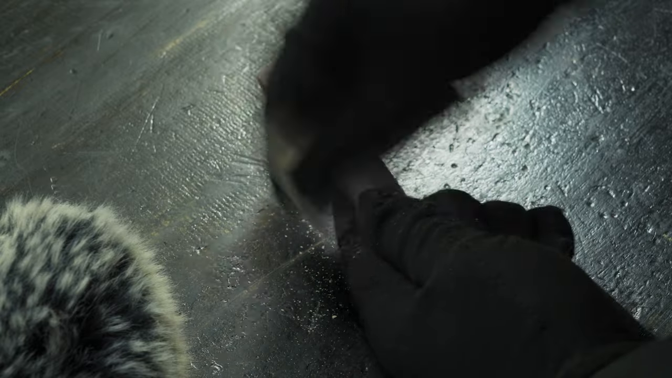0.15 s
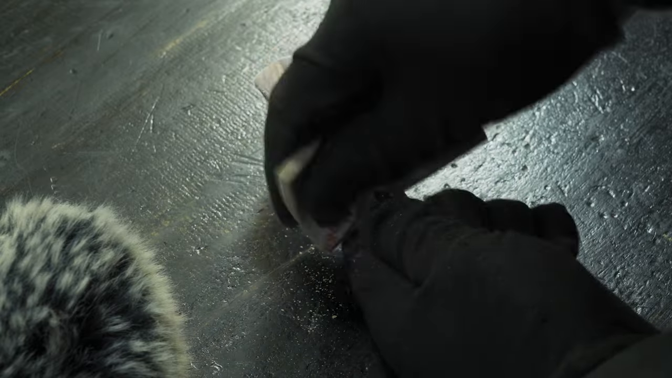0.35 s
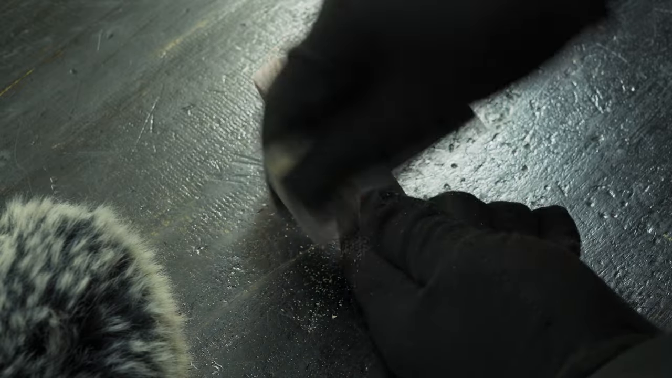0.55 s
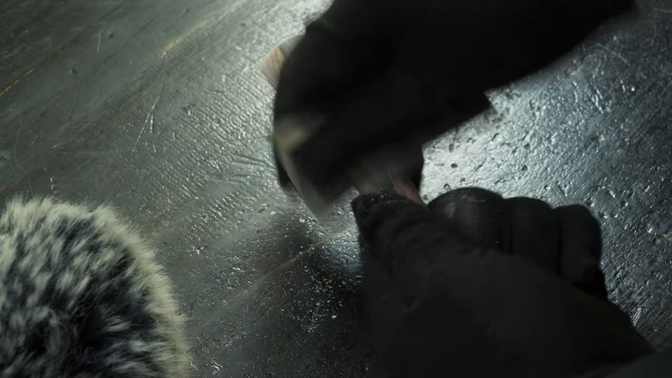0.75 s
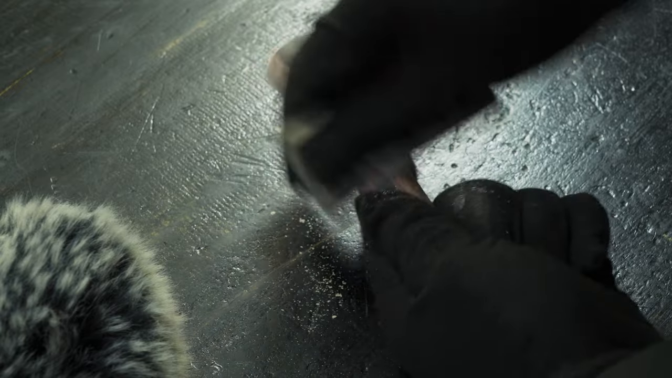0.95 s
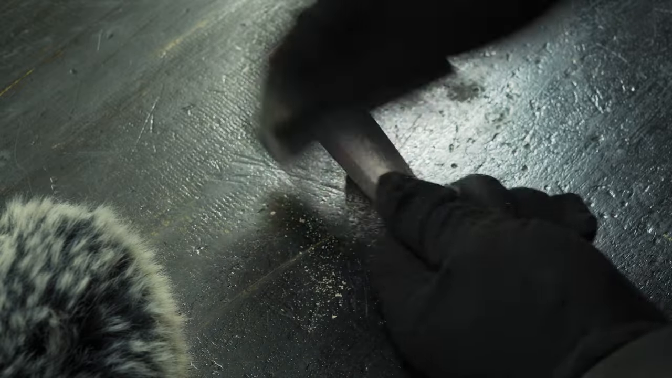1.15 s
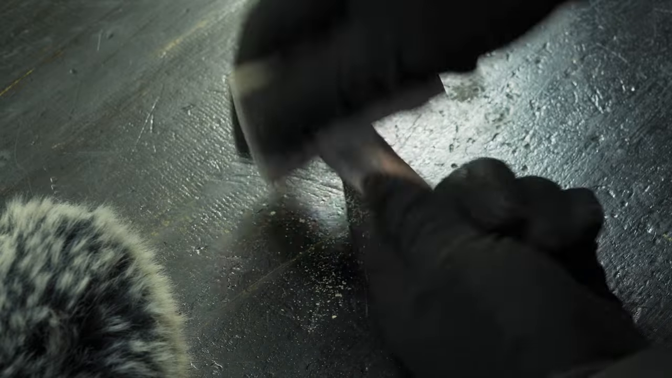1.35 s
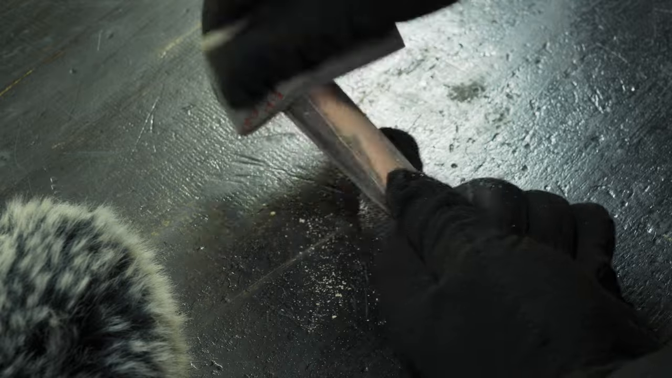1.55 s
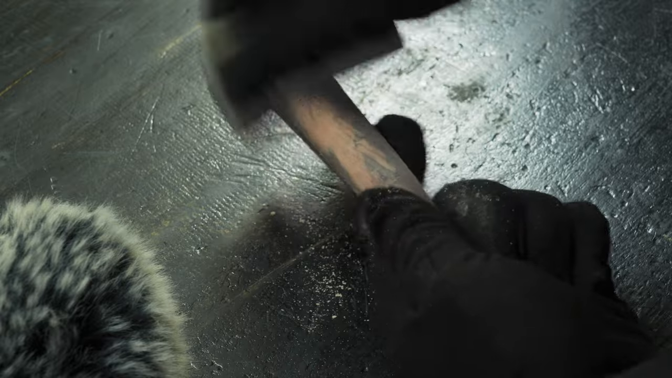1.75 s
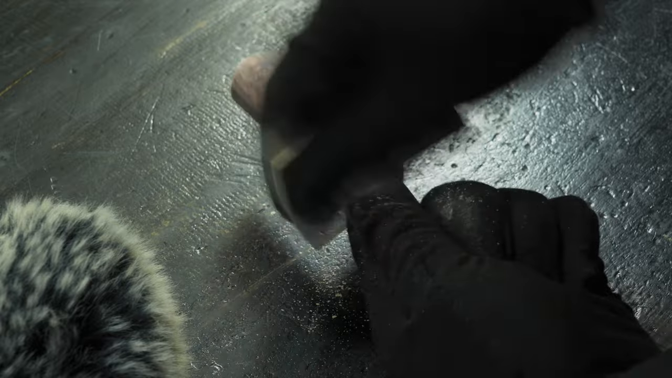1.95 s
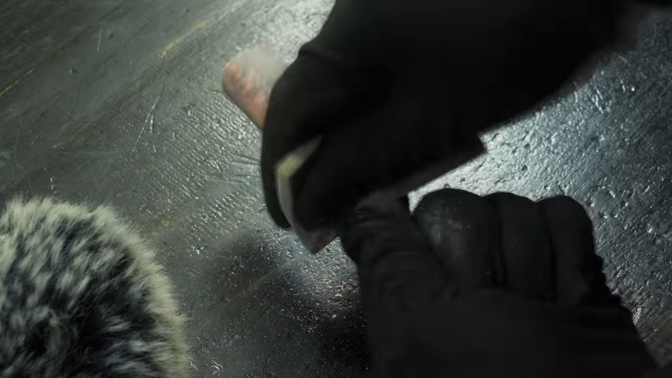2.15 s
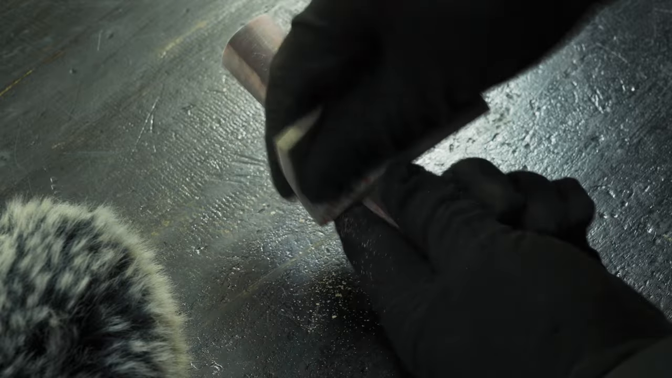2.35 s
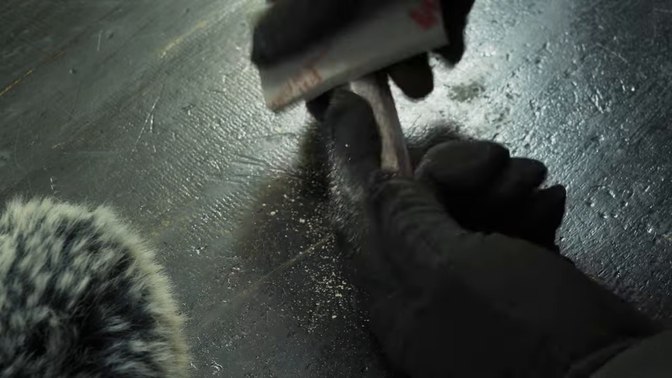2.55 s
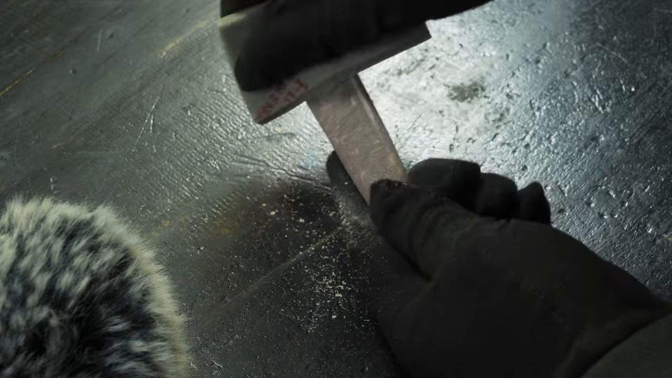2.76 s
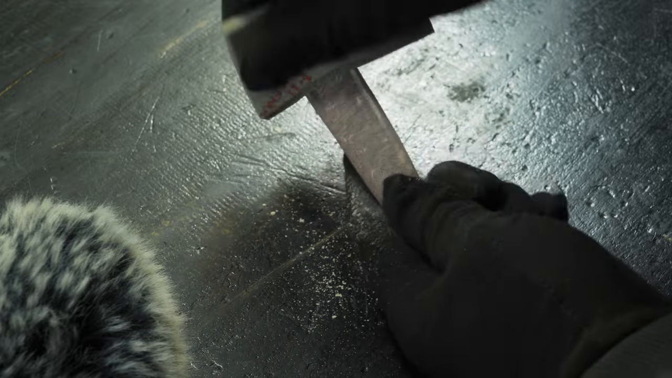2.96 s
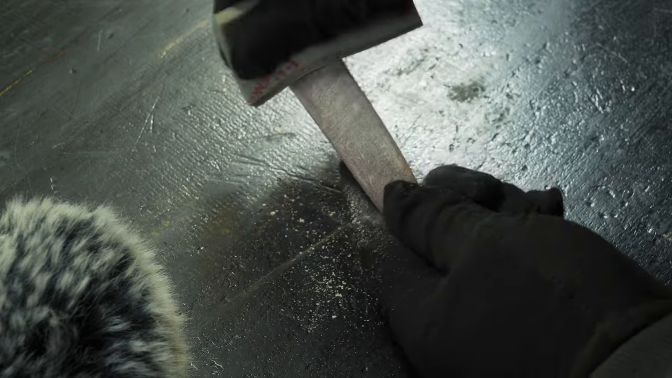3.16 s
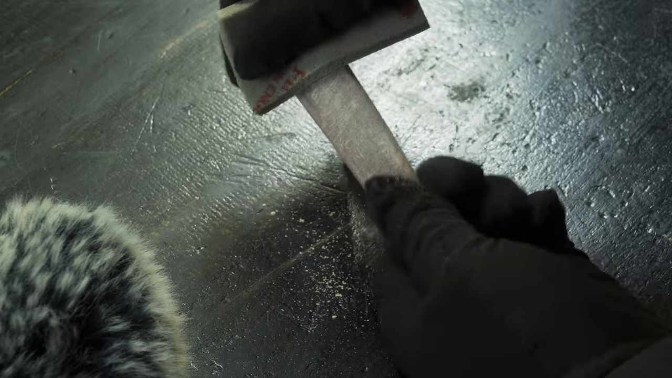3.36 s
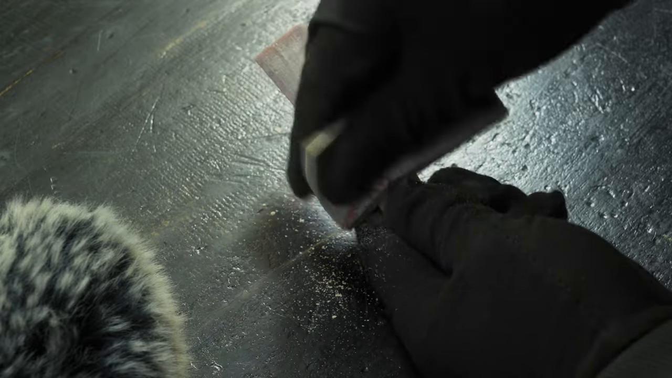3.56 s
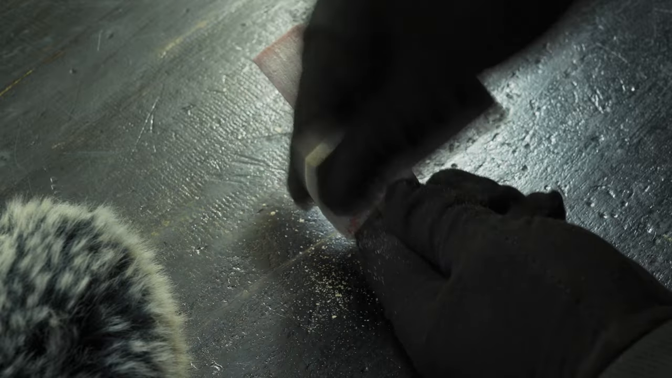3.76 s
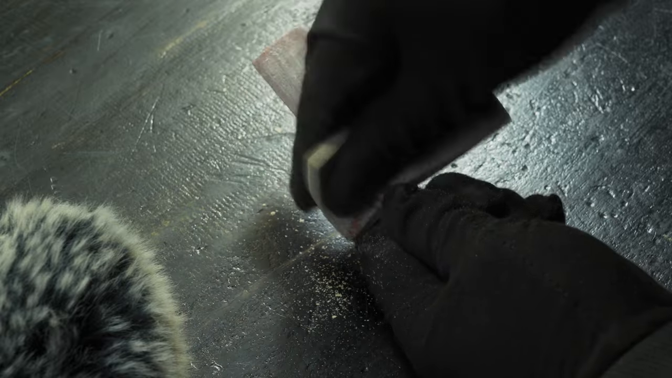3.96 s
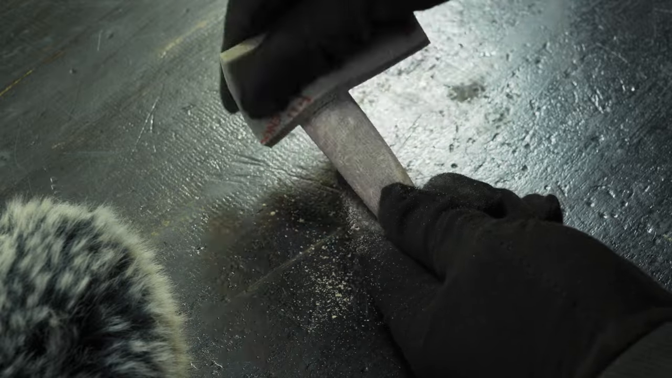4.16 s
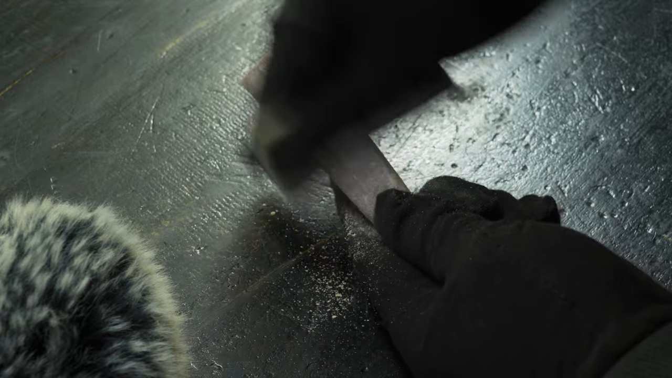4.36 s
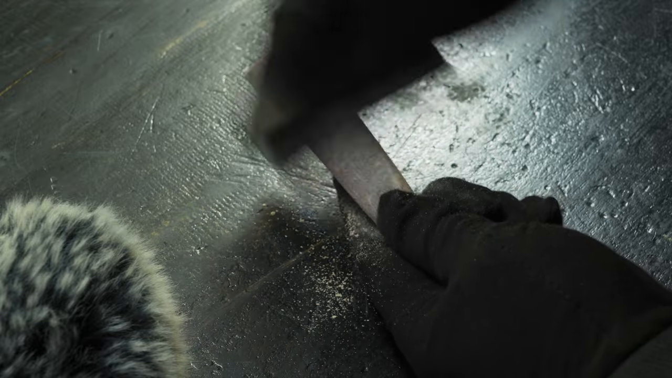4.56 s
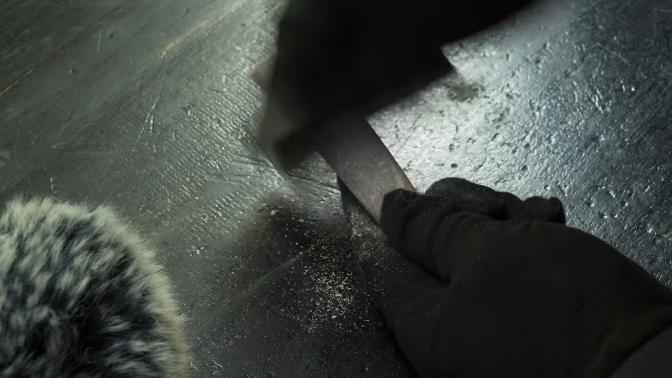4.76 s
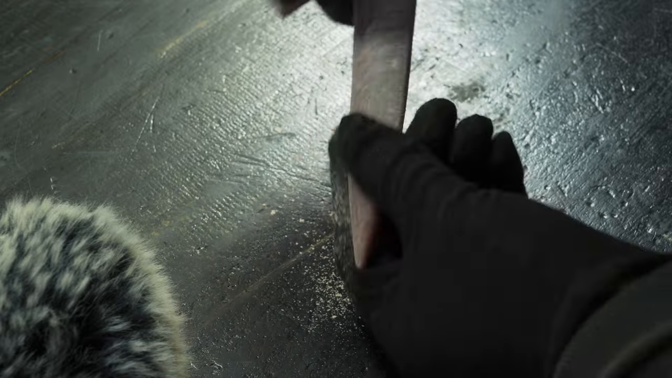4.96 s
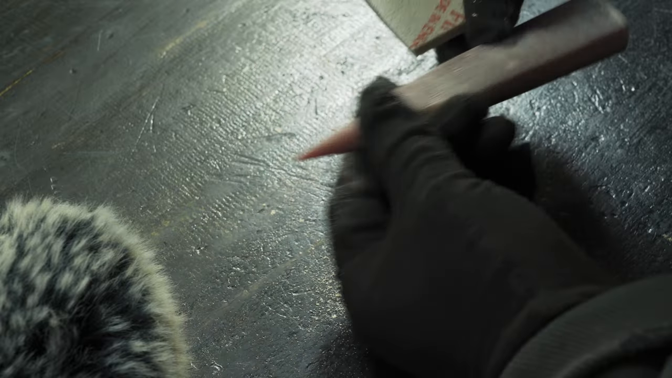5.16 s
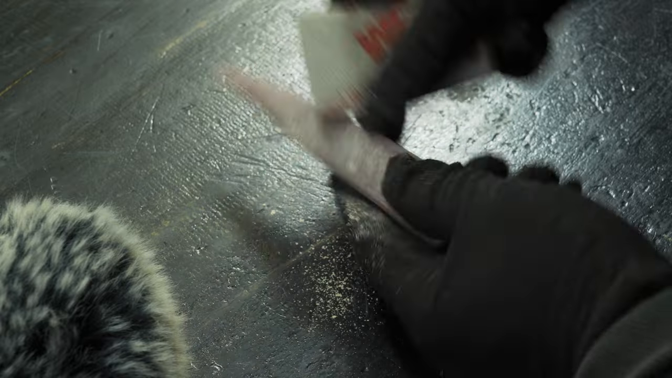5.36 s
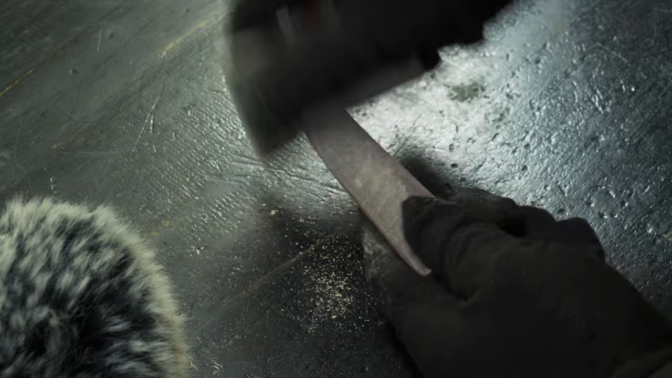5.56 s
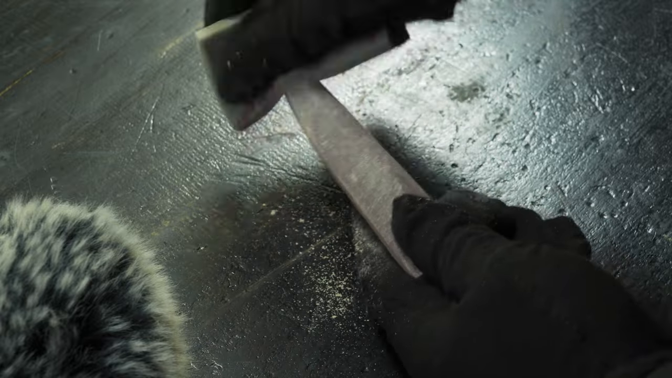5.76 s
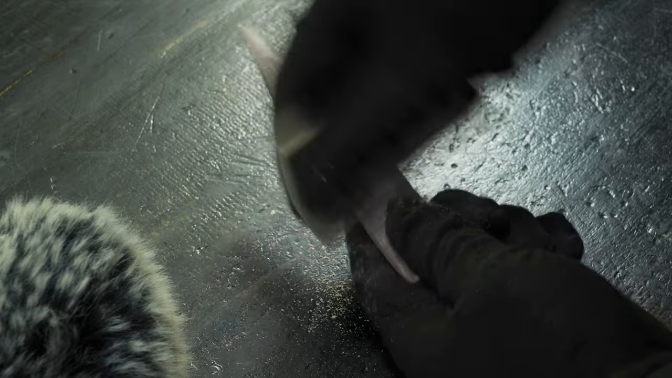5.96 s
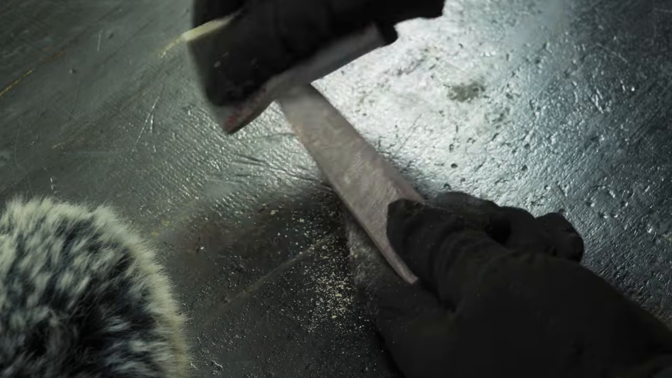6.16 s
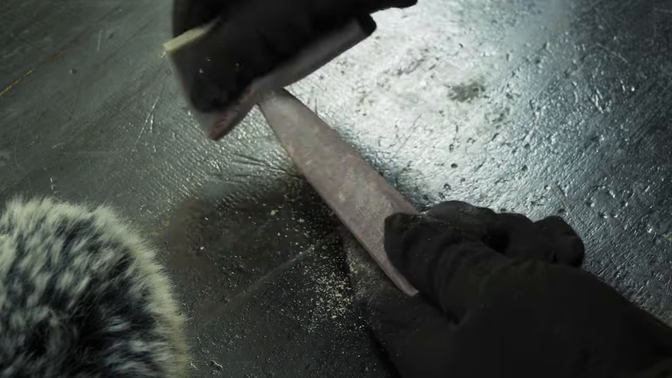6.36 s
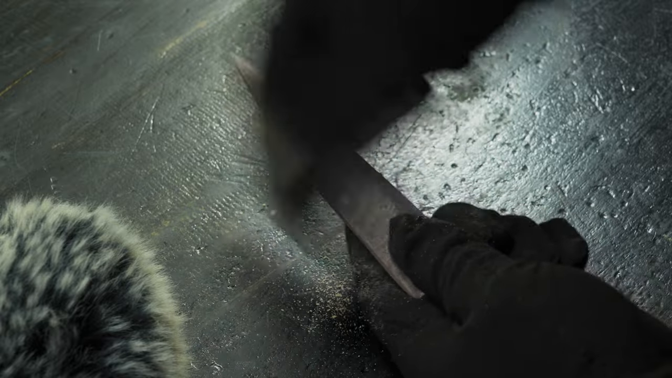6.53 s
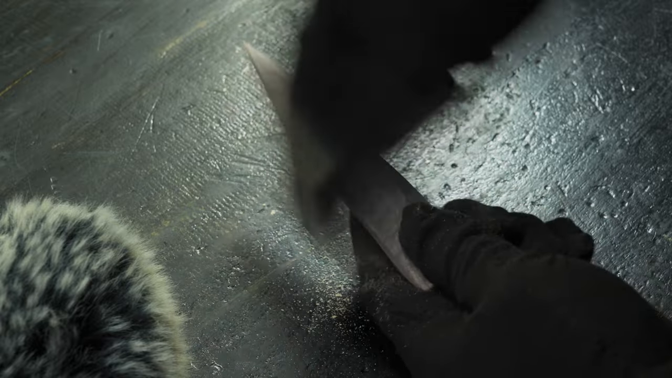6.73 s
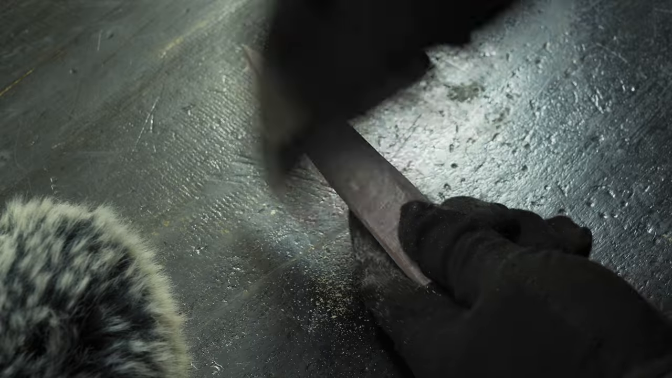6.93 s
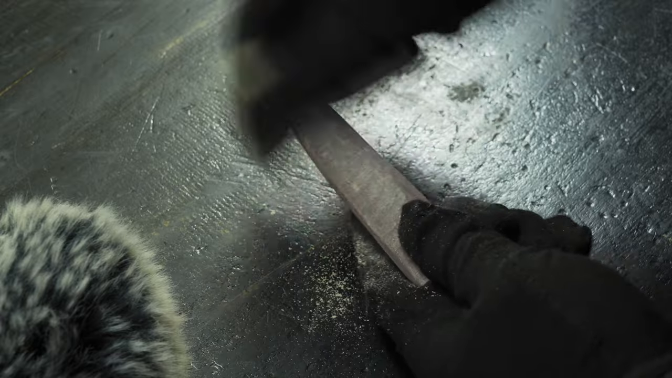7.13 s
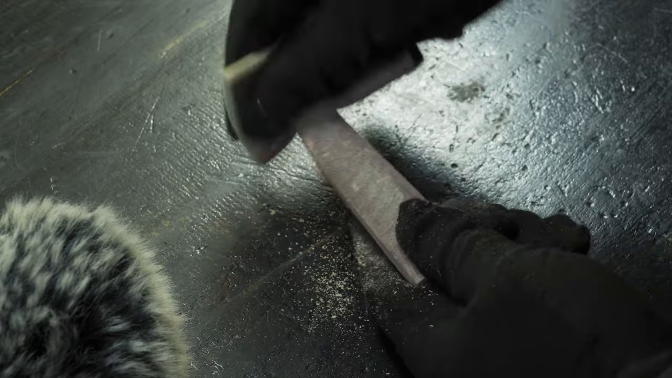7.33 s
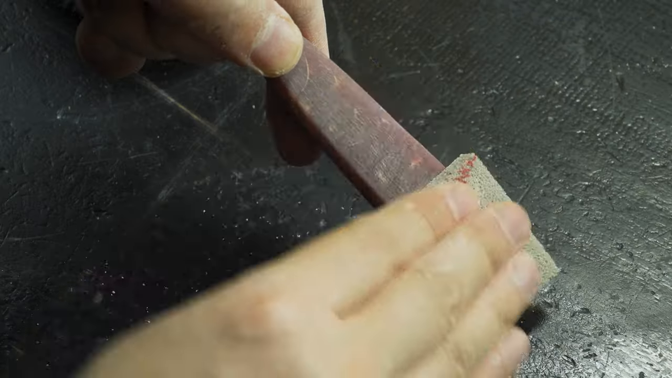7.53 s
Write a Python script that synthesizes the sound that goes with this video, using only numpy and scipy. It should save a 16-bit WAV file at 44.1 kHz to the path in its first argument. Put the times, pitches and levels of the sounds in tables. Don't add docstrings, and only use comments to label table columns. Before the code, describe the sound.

Close, dry, rapid sanding strokes, about twenty rasps a second, paused by rustling grip shifts, small clacks and faint thumps on a table.

```python
import sys
import numpy as np
from scipy import signal
from scipy.fft import rfft, irfft
from scipy.io import wavfile
from scipy.ndimage import uniform_filter1d

SR = 44100
rng = np.random.default_rng(int(sys.argv[2]) if len(sys.argv) > 2 else 0)


def undo_db(level):
    steps = np.asarray(level, float) / 20
    return 10 ** steps


def master_out(mix):
    frames = np.transpose(np.atleast_2d(mix))
    ceiling = np.clip(frames, -1, 1)
    pcm = np.round(ceiling * 32767).astype(np.int16)
    wavfile.write(sys.argv[1], SR, pcm)


N = 334719
TIME = np.arange(N) / SR
HZ = np.fft.rfftfreq(N, 1 / SR) + 1

# push_s, pull_s, push_db, pull_db
ROUND_SIDE = [(.031, .081, -37.5, -41.5), (.132, .177, -38.5, -39.5), (.226, .273, -39.5, -39.5),
              (.323, .365, -38.5, -39.5), (.417, .463, -39.5, -40), (.513, .557, -40.5, -40),
              (.609, .652, -40, -40.5), (.711, .756, -37, -42), (.811, .851, -42.5, -46),
              (.901, .948, -44.5, -45.5), (1.000, 1.052, -47.5, -44.5), (1.100, 1.145, -41, -40),
              (1.196, 1.240, -38, -40.5), (1.561, 1.606, -41, -42), (1.657, 1.702, -44, -42),
              (1.750, 1.796, -45, -46), (1.844, 1.887, -47, -49), (2.027, 2.071, -46.5, -46.5),
              (2.123, 2.166, -43.5, -46.5), (2.220, 2.263, -45.5, -45), (2.315, 2.363, -47, -43.5),
              (2.417, 2.464, -45.5, -43.5)]
# push_s, pull_s, push_db, pull_db, tip_tap_db as the push sets in
FIRST_FLAT = [(3.067, 3.114, -37, -39, -79), (3.175, 3.215, -38, -39, -60.5), (3.265, 3.313, -40, -41, -73),
              (3.507, 3.557, -43.5, -41.5, -70), (3.622, 3.661, -41.5, -41.5, -80),
              (3.722, 3.769, -42, -41, -53.5), (3.822, 3.869, -42, -40.5, -75),
              (3.92, 3.969, -43, -41, -62), (4.020, 4.065, -41.5, -41.5, -81),
              (4.117, 4.162, -44, -43.5, -67), (4.3, 4.347, -42.5, -42, -54.5),
              (4.397, 4.446, -41.5, -41, -57), (4.496, 4.544, -41, -41, -52.5),
              (4.593, 4.640, -42.5, -42, -61.5), (4.690, 4.738, -42.5, -41, -58.5)]
SECOND_FLAT = [(5.645, 5.693, -37.5, -39.5, -86), (5.756, 5.798, -37.5, -40.5, -70),
               (5.858, 5.904, -38.5, -38.5, -67), (6.024, 6.076, -42.5, -40, -61.5),
               (6.13, 6.175, -38.5, -41.5, -52.5), (6.335, 6.385, -42.5, -40.5, -66),
               (6.508, 6.557, -42.5, -39.5, -57.5), (6.608, 6.651, -39.5, -39, -58),
               (6.704, 6.752, -40, -38, -52.5), (6.804, 6.851, -39.5, -39, -46),
               (6.906, 6.949, -38.5, -39.5, -50.5), (7.008, 7.056, -39, -40, -60.5),
               (7.11, 7.157, -39.5, -39.5, -53), (7.214, 7.266, -39, -40, -44.5),
               (7.319, 7.37, -38, -39.5, -50), (7.425, 7.471, -38, -39.5, -54)]
# start_s, length_s, start_db, end_db, body_db re grit
LONE_STROKES = [
    (0.0, 0.014, -47, -57, -10.5),
    (1.341, .017, -48, -47, -12),
    (1.43, 0.045, -53, -47.5, -20),
    (1.502, .04, -44, -41.5, -23),
    (2.51, .028, -41, -40.5, -9.5),
    (2.76, 0.018, -46, -49, -18),
    (4.791, 0.031, -41.5, -37, -14),
    (4.838, 0.048, -39.5, -34, -17.5),
    (7.527, .03, -39.5, -39.5, -19.5),
]
# time_s, push_swell_db, pull_swell_db, thick_end_body_db, thin_end_body_db
GRIP = [(0, 1, -6, -4, -8), (.35, 4.5, -9.5, -10.5, -16.5), (.65, 8, -11, -12, -18),
        (1.0, 3, -6, -15, -19.5), (1.2, 4, -11.5, -12.5, -21.5), (1.6, -3, -9, -13, -22),
        (1.9, 6, -9, -14.5, -26.5), (2.45, 5, -10.5, -17.5, -28), (3.05, -6.5, -2, -5.5, -9),
        (3.35, 4, -6, -8.5, -10.5), (3.5, 3.5, -4, -7, -10), (4.0, 4.5, -8, -6, -13.5),
        (4.75, 4.5, -6, -8, -13), (5.6, -5, 0.5, -13, -19.5), (6.15, -3.5, -5, -12, -14.5),
        (6.35, 3, -2.5, -10, -18), (6.9, 2.5, -4, -14.5, -18), (7.5, 2, -6.5, -14.5, -21)]
# time_s, after_push_s, after_pull_s, softness (of stop and start, ratio)
TURN_RESTS = [(0, 0.014, .015, 0.76), (1.9, 0.013, 0.01, 0.94), (2.45, 0.013, 0.0061, 0.87),
              (3.05, 0.013, 0.014, 0.75), (4.8, .013, .012, 0.78), (5.6, .012, 0.018, 0.97),
              (7.5, 0.017, 0.015, 0.64)]
LONGEST_PULL_S, LAST_PULL_S = 0.0427, 0.039
BOUT_GAP_S = 0.066
PULL_THICK_DB, PULL_THIN_DB = -2.5, -3.5

# start_s, length_s, start_db, end_db, paper_db re grit
SCUFFS = [(1.278, 0.047, -63, -60, -5), (1.328, .012, -69, -66, -8), (1.359, .011, -58, -60, -2),
          (1.396, .011, -65, -65, -6), (1.421, .01, -66, -62, -2), (2.545, .057, -57, -53, -1),
          (2.708, .04, -80, -83, -24), (2.813, .015, -70, -71, 4), (2.618, 0.032, -57.5, -65, 1),
          (2.652, 0.056, -77, -70.5, -8), (2.777, 0.08, -70, -78, 0), (2.865, 0.0069, -71, -63, 3),
          (3.004, 0.018, -56, -77, -13), (3.028, 0.048, -69, -65.5, -17), (4.884, 0.057, -50, -56, -10),
          (4.943, .048, -66, -74, -10), (4.993, .19, -78, -84, -34), (5.215, .014, -73, -74, -30),
          (5.1835, 0.002, -50, -50, -12), (5.188, 0.14, -77, -82, -34), (5.328, .016, -86, -84, 8),
          (5.345, 0.022, -81, -83, 8), (5.37, .04, -80, -78, -24), (5.41, 0.074, -74, -64, -1),
          (5.484, 0.03, -59, -59, -4), (5.518, 0.062, -60, -60, -8), (5.58, .018, -65, -66, -6),
          (5.6, 0.028, -59, -60, -4)]
# start_s, length_s, start_db, end_db
GLOVE_RUBS = [
    (.132, 0.0029, -58, -50),
    (2.317, 0.0064, -41, -54),
    (2.891, 0.014, -61, -59.5),
    (3.471, 0.005, -67, -72),
    (5.292, 0.02, -74, -74),
    (5.298, .008, -67, -67),
    (5.555, .025, -68, -68),
]
SCUFF_SOFTNESS = 2.2
SCUFF_BODY_DB, SCUFF_BODY_SLOPE = -15, -0.084
GLOVE_BODY_DB, GLOVE_PAPER_DB = 0.5, -32
CREEP_SHARE, CREEP_SLOWER = 0.18, 3.4

# time_s, top_band_db re middle band, hollow_db
EDGE = [(0, -2.5, 0.5), (.3, 2, -2), (.8, 0.5, -5.5), (1.3, 3, -4.5), (2.45, 1.5, -5), (3.05, -2, 0),
        (3.5, 5, 1), (4.9, 3, -2), (5.6, 0, 1), (6.5, 0.5, 0.5), (7.59, 3.5, -0.5)]
# pitch_hz, level_db per Hz
GRIT = [(530, -18.5), (900, -30), (1330, -29), (1410, -28), (1980, -18.5), (3490, -8), (3800, -6.5),
        (4780, 3), (6700, -4.5), (7470, 1.5), (8960, -2.5), (11500, 2.5), (13200, -3), (15100, -0.5),
        (15850, -0.5), (16250, -24.5)]
BODY_TOP_HZ, EDGE_FROM_HZ = 3440, 11240
HOLLOW_HZ, HOLLOW_WIDTH_HZ = 6200, 1200
PAD_HZ, PAD_TILTED_HZ, PAD_WIDTH_HZ = 4900, 5900, 650

# pitch_hz, level_db, t60_s
BOARD = [(424, 4.5, 0.066), (592, -10.5, 0.074), (245, -10, 0.03)]
ROOM_T60_S, ROOM_DB, ROOM_CUT_HZ = 0.125, -16, 3900
SCENE_CHANGES_S = 7.563
# pitch_hz, level_db
HUM = [(60, -22), (110, -28), (160, -11), (250, -7), (420, -4.5), (640, -1.5), (800, -4.5), (1020, -2),
       (1400, -5), (2300, -11), (3900, -22), (5200, -21.5), (12000, -29), (12500, -52)]
# time_s, level_db
HUM_DB = [(0, -74), (3, -74), (5.2, -74.5), (7.59, -76.5)]
# pitch_hz, level_db
FAN_LINES = [(150, -99), (900, -85), (1015, -83.5)]

# start_s, peak_db, pitch_hz
JOLTS = [(0.248, -62.5, 264), (0.532, -54.5, 245), (0.708, -60.5, 248), (2.069, -69, 137),
         (2.165, -62, 303), (2.261, -70, 117), (2.338, -61.5, 223), (2.436, -58, 225), (2.645, -68, 262),
         (3.621, -64.5, 230), (3.666, -66, 210), (3.70, -67, 200), (3.76, -68, 205), (5.771, -63, 172),
         (6.602, -60.5, 256), (6.839, -60.5, 173), (7.344, -62.5, 204), (7.45, -61, 299), (7.567, -70, 150)]
# start_s, peak_db, pitch_hz
JOLTS_EARLY = [(0.316, -66, 223), (0.44, -66, 304)]
JOLTS_ROUND_PAUSE = [(0.984, -71, 304), (1.192, -68, 221), (1.585, -69, 288), (1.681, -68, 127),
                     (1.778, -67, 245), (1.869, -62, 213)]
JOLTS_LATE = [(5.875, -63, 253), (6.018, -67, 339), (6.125, -62, 339), (6.273, -83, 151)]
# time_s, peak_db
TURN_BUMPS = [(0, -64.5), (2.5, -60), (3.1, -80), (5.6, -63), (7.5, -59)]
THUMP_HZ, THUMP_T60_S = 152, 0.034

# start_s, peak_db
EARLY_TAPS = [(0.034, -68), (0.066, -62), (0.162, -69), (0.414, -66), (0.454, -68), (0.541, -58), (0.607, -70)]
# start_s, peak_db
TAPS = [(.636, -63), (.714, -49), (.949, -60), (.989, -55.5), (1.731, -51.5), (2.131, -55), (2.218, -62),
        (2.247, -58), (2.344, -55), (3.139, -60), (3.615, -58), (3.846, -57), (3.943, -62), (4.031, -56),
        (4.406, -52), (4.53, -55), (4.725, -48.5), (4.794, -49), (4.821, -43.5), (5.45, -66),
        (5.667, -63.5), (6.367, -66), (6.408, -70), (6.522, -59), (6.543, -58), (7.082, -70), (7.251, -55),
        (7.291, -69), (5.877, -57), (6.634, -54), (6.834, -51.5), (6.938, -56), (7.138, -55.5),
        (7.354, -58), (7.454, -48.5), (7.529, -52)]
# start_s, peak_db, pitch_hz, t60_s
KNOCKS = [(0.7159, -22, 4960, 0.0051), (.7150, -26.5, 2330, 0.0039), (0.717, -36, 1425, 0.011),
          (4.8821, -25, 3100, 0.002), (4.8824, -28, 338, 0.013), (4.8832, -37, 1050, 0.0079),
          (5.185, -40, 300, 0.01), (5.198, -20, 875, 0.0029), (5.1980, -20, 2300, 0.0008),
          (5.1978, -37, 3900, .004), (5.1835, -50, 1600, .008), (5.338, -43, 428, 0.075),
          (5.3367, -41.5, 592, 0.053), (5.338, -49, 1310, 0.069), (5.338, -54, 1000, .03),
          (5.3560, -50, 1335, 0.045), (5.3560, -53, 425, 0.07), (5.356, -55, 600, .06),
          (5.355, -61, 1110, .035), (2.319, -40, 2300, .006), (7.5570, -46, 248, 0.013),
          (7.556, -49, 595, 0.014)]
# start_s, peak_db, centre_hz
TICKS = [(1.3703, -52, 8000), (2.662, -68, 8000), (2.671, -68, 6000), (2.686, -68, 4600),
         (2.785, -62, 9000), (2.805, -65, 9000), (2.813, -63, 7000), (2.8671, -60, 10000),
         (2.872, -60, 7000), (3.0033, -60, 5200), (3.0297, -62, 5700), (3.046, -62, 7000),
         (3.051, -62, 6000), (4.938, -57, 4500), (4.946, -61, 4000), (4.981, -68, 7000), (4.99, -66, 6500),
         (5.008, -68, 6500), (5.0994, -69, 6000), (5.107, -71, 7500), (5.132, -72, 6500),
         (5.1518, -72, 8000), (5.1832, -52, 7900), (5.4471, -63, 11000), (5.485, -54, 11000),
         (5.505, -54, 7000), (5.515, -56, 6000), (5.6128, -53, 5100), (2.796, -51, 10700),
         (2.82, -58, 11200), (2.8604, -57, 11100), (2.9955, -65, 5100), (3.038, -63.5, 4600),
         (5.168, -57.5, 4900), (5.2634, -65, 5470), (5.392, -69, 7000), (5.402, -65, 5500),
         (5.4186, -60, 8000), (5.5415, -47, 6100), (5.596, -51, 8500), (5.620, -48, 9000)]

BASS_CUT_HZ = 90
LEFT_DB, RIGHT_DB = -6.4, 3.63


def rms_one(x):
    return x / np.sqrt(np.mean(x ** 2) + 1e-20)


def colour(spectrum):
    hz, level_db = np.transpose(spectrum)
    return undo_db(np.interp(np.log(HZ), np.log(hz), level_db))


def drift(rate_hz):
    r = np.exp(-2 * np.pi * rate_hz / SR)
    noise = rng.standard_normal(N + SR)
    return rms_one(signal.lfilter([1], [1, -2 * r, r * r], noise)[SR:])


def ring(clicks, hz, t60):
    r, w = undo_db(-60 / (t60 * SR)), 2 * np.pi * hz / SR
    return signal.lfilter([0, np.sin(w)], [1, -2 * r * np.cos(w), r * r], clicks + 1e-18)


def add(out, s, size, hz, t60, soft_s):
    at = round(s * SR)
    t = TIME[:min(N - at, round(t60 * SR))]
    swing = np.sin(2 * np.pi * hz * t) * undo_db(-60 * t / t60)
    out[at:at + len(t)] += size * swing * -np.expm1(-t / soft_s)


def catches(per_s, spread_db):
    sizes = undo_db(spread_db * np.minimum(rng.exponential(1, N), 5)) * rng.choice([-1, 1], N)
    return rms_one(sizes * (rng.random(N) < per_s / SR))


def strokes():
    # start_s, length_s, start_db, end_db, body_start_db, body_end_db
    rows = [(*row, row[-1]) for row in LONE_STROKES]
    cycles = [*ROUND_SIDE, *FIRST_FLAT, *SECOND_FLAT]
    starts = np.sort([row[0] for row in cycles + LONE_STROKES])
    grip_s, *grip = np.transpose(GRIP)
    rest_s, *rests, _ = np.transpose(TURN_RESTS)
    for push_s, pull_s, push_db, pull_db, *_ in cycles:
        push_swell, pull_swell, thick_db, thin_db = (np.interp(pull_s, grip_s, column) for column in grip)
        push_rest, pull_rest = (np.interp(pull_s, rest_s, column) for column in rests)
        wait = starts[np.searchsorted(starts, pull_s)] - pull_s
        push_length = pull_s - push_s - push_rest
        pull_length = min(wait - pull_rest, LONGEST_PULL_S) if wait < BOUT_GAP_S else LAST_PULL_S
        rows.append((push_s, push_length, push_db - push_swell / 2, push_db + push_swell / 2,
                     thick_db, thin_db))
        rows.append((pull_s, pull_length, pull_db - pull_swell / 2, pull_db + pull_swell / 2,
                     thin_db + PULL_THIN_DB, thick_db + PULL_THICK_DB))
    return sorted(rows)


def scuffs():
    rows = []
    for s, length, start_db, end_db, paper_db in SCUFFS:
        body_db = SCUFF_BODY_DB + SCUFF_BODY_SLOPE * ((start_db + end_db) / 2 + 62)
        rows.append((s, length, start_db, end_db, body_db, body_db, paper_db, SCUFF_SOFTNESS))
    for row in GLOVE_RUBS:
        rows.append((*row, GLOVE_BODY_DB, GLOVE_BODY_DB, GLOVE_PAPER_DB, SCUFF_SOFTNESS))
    return rows


def pressure(rise_s, fall_s, bulge_db, sharpen, lean):
    pad, paper, body, loose = np.zeros((4, N))
    firm = [(*row, 0, 1) for row in strokes()]
    turns = np.transpose(TURN_RESTS)
    for s, length, start_db, end_db, body_start_db, body_end_db, paper_db, soft in firm + scuffs():
        uphill = undo_db(np.clip(lean * (end_db - start_db), -6, 6))
        softness = soft * np.interp(s, turns[0], turns[-1])
        rise, fall = rise_s * uphill * softness, fall_s / uphill * softness
        span = slice(max(0, int((s - 24 * rise) * SR)), min(N, int((s + length + 24 * fall) * SR)))
        t = TIME[span] - s
        along = np.clip(t / length, 0, 1)
        edges = 0
        creep_slower = CREEP_SLOWER if soft == 1 else 1
        for share, slower in ((1 - CREEP_SHARE, 1), (CREEP_SHARE, creep_slower)):
            onset = 1 + np.exp(-t / rise / slower)
            stop = 1 + np.exp((t - length) / fall / slower)
            edges = edges + share / onset / stop
        gain = edges * undo_db(start_db + (end_db - start_db) * along + bulge_db * np.sin(np.pi * along))
        pad[span] += gain
        loose[span] += gain * (soft != 1)
        paper[span] += gain * undo_db(paper_db + sharpen * (end_db - start_db) * (along - 0.5))
        travel = np.clip(2 * along - 0.5, -0.3, 1.3)
        body[span] += gain * undo_db(body_start_db + (body_end_db - body_start_db) * travel)
    return pad, paper, body, loose


def sanding(pad, paper, body, loose):
    s, edge_db, hollow_db = np.transpose(EDGE)
    edge, hollow = undo_db(np.interp(TIME, s, edge_db)), undo_db(np.interp(TIME, s, hollow_db))
    low = 1 / (1 + (HZ / BODY_TOP_HZ) ** 8)
    high = 1 / (1 + (EDGE_FROM_HZ / HZ) ** 14)
    shape = colour(GRIT)
    grit = rfft(catches(per_s=18000, spread_db=2.3)) * shape
    upper_rms = np.sqrt(np.mean((shape * (1 - low)) ** 2))

    mid_band = grit * (1 - low - high)
    middle = irfft(mid_band, N) / upper_rms
    dip = np.exp(-((HZ - HOLLOW_HZ) / HOLLOW_WIDTH_HZ) ** 2)
    middle -= (1 - hollow) * irfft(mid_band * dip, N) / upper_rms
    grip = drift(4.5)
    for hz, swing_db in ((PAD_HZ, 2.16), (PAD_TILTED_HZ, -1.5)):
        peak = np.exp(-((HZ - hz) / PAD_WIDTH_HZ) ** 2)
        middle += (undo_db(swing_db * grip) - 1) * irfft(grit * peak, N) / upper_rms

    grains = rfft(catches(per_s=900, spread_db=4.0))
    crackle = rms_one(irfft(grains * shape * (1 - 0.97 * high), N))
    bright = irfft(grit * high, N) / upper_rms
    dull = rms_one(irfft(grit * low / (1 + (700 / HZ) ** 4), N))

    uneven = 0.8 * drift(150)
    crackling = undo_db(-11) * uniform_filter1d(loose, size=SR // 70) * crackle
    through_pad = pad * middle * undo_db(uneven + 0.75 * drift(51) - 1.08)
    through_paper = paper * edge * bright * undo_db(uneven + 1.2 * drift(60) + 1.9 * drift(17))
    through_stick = body * dull * undo_db(uneven + 2.8 * drift(87) + 2.05)
    return crackling + through_pad + through_paper + through_stick


def board_drone(pad):
    shake = pad * rng.standard_normal(N) * undo_db(3.5 * drift(15))
    return undo_db(-59.5) * sum(undo_db(level_db) * ring(shake, hz, t60) for hz, level_db, t60 in BOARD)


def room(x):
    t = TIME[:SR // 2]
    tail = rng.standard_normal(len(t)) * undo_db(-60 * t / ROOM_T60_S) * np.clip(t / 0.00087, 0, 1)
    tail = signal.sosfilt(signal.butter(1, ROOM_CUT_HZ, fs=SR, output="sos"), tail)
    tail = tail / np.sqrt(np.sum(tail ** 2))
    return undo_db(ROOM_DB) * signal.fftconvolve(x, tail)[:N] * (TIME < SCENE_CHANGES_S)


def hum():
    air = rms_one(irfft(rfft(rng.standard_normal(N)) * colour(HUM), N))
    air = air * undo_db(np.interp(TIME, *np.transpose(HUM_DB)) + 0.42 * drift(1.3))
    wide = rng.standard_normal(N)
    return air + sum(undo_db(level_db) * rms_one(ring(wide, hz, 0.22)) for hz, level_db in FAN_LINES)


def thumps():
    out = np.zeros(N)
    for s, peak_db, hz in JOLTS + JOLTS_EARLY + JOLTS_ROUND_PAUSE + JOLTS_LATE:
        add(out, s, undo_db(peak_db + 9.5), hz, THUMP_T60_S, soft_s=0.0015)
    turns = [s + length for s, length, *_ in strokes()]
    for s, (size, pitch) in zip(turns, rng.standard_normal((len(turns), 2))):
        peak_db = np.interp(s, *np.transpose(TURN_BUMPS)) + 4 * min(size, 1)
        add(out, s, undo_db(peak_db), THUMP_HZ * undo_db(3 * pitch), THUMP_T60_S, soft_s=0.002)
    return out


def taps():
    hits = sorted(TAPS + EARLY_TAPS + [(row[0], row[-1]) for row in FIRST_FLAT + SECOND_FLAT])
    out = np.zeros(N)
    for (s, peak_db), luck in zip(hits, rng.standard_normal((len(hits), 6))):
        bounce = (0.013 + 0.00272 * luck[3], -11 + 4.0 * min(luck[4], 1))
        for delay, bounce_db in ((0, 0), bounce):
            for k, (hz, level_db, t60) in enumerate(BOARD):
                size = undo_db(peak_db + level_db + bounce_db + 3 * min(k, 1) * luck[k])
                damped_t60 = t60 * undo_db(1.8 * luck[0] + 0.3)
                mode_hz = hz * (1 + 0.025 * luck[5])
                add(out, min(s + delay, TIME[-1]), size, mode_hz, damped_t60, soft_s=0.0014)
    return out


def knocks():
    out = np.zeros(N)
    for s, peak_db, hz, t60 in KNOCKS:
        add(out, s, -undo_db(peak_db + 3), hz, t60, soft_s=max(0.3 / hz, t60 / 45))
    for (s, peak_db, hz), grains in zip(TICKS, rng.random((len(TICKS), 4, 3))):
        for late, size, pitch in grains:
            grain_hz = min(hz * undo_db(10.0 * (pitch - 0.5)), 13000)
            grain_size = undo_db(peak_db + 10.5 - 4.7 * size)
            add(out, s + 0.0013 * late, grain_size, grain_hz, 11.0 / grain_hz, soft_s=0.41 / grain_hz)
    return signal.sosfilt(signal.butter(3, 170, "high", fs=SR, output="sos"), out)


def scene():
    gains = pressure(rise_s=0.0012, fall_s=0.0011, bulge_db=-0.26, sharpen=0.28, lean=0.53)
    scrape = sanding(*gains)
    table = taps() + thumps() + knocks() + board_drone(gains[0])
    mix = scrape + table + room(scrape + undo_db(-7.5) * table) + hum()
    return mix * undo_db(np.array([[LEFT_DB], [RIGHT_DB]]))


def band_limit(x):
    return signal.sosfilt(signal.butter(12, 16820, fs=SR, output="sos"), x)


def record(dry):
    cut = signal.sosfilt(signal.butter(3, BASS_CUT_HZ, "high", fs=SR, output="sos"), dry)
    cut = signal.sosfilt(signal.cheby2(14, 60, 16300, fs=SR, output="sos"), cut)
    rumble_band = signal.butter(2, [20, 38], "band", fs=SR, output="sos")
    rumble = signal.sosfilt(rumble_band, rng.standard_normal((3, N)))
    rumble = rms_one(rumble[0] * [[0.7], [1]] + 0.32 * rumble[1:])
    rubbing = rms_one(uniform_filter1d(np.abs(dry[-1]), size=SR // 10))
    shaking = undo_db(-17) + np.clip(rubbing, 0, 1.2)
    return band_limit(cut + undo_db(-88) * shaking * rumble)


dry = scene()
out = record(dry)
master_out(out)
```